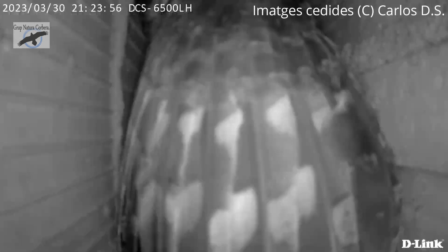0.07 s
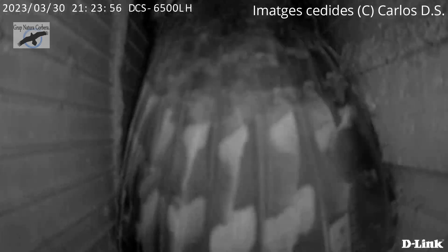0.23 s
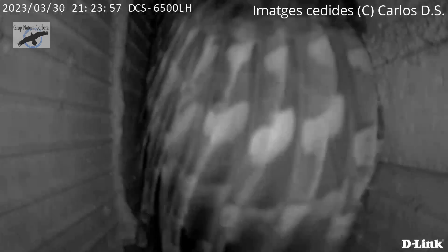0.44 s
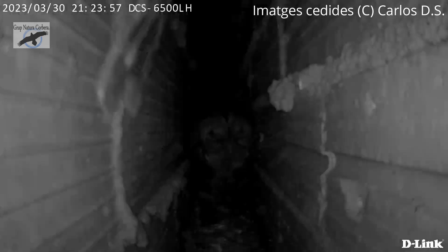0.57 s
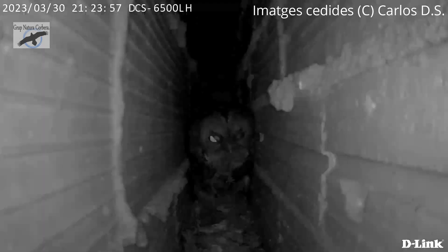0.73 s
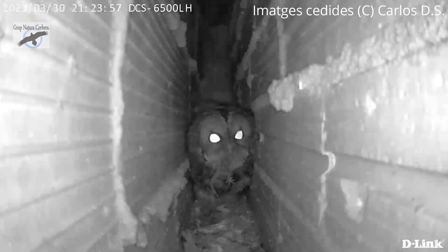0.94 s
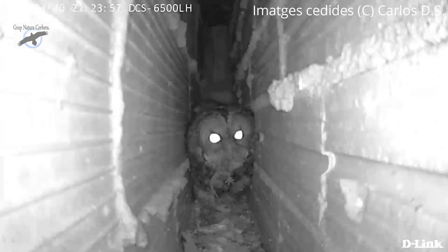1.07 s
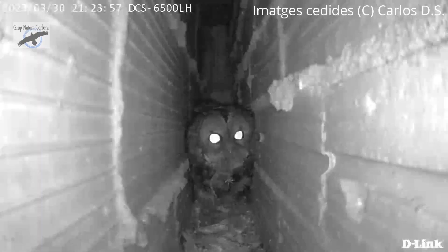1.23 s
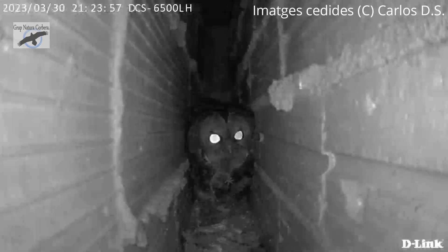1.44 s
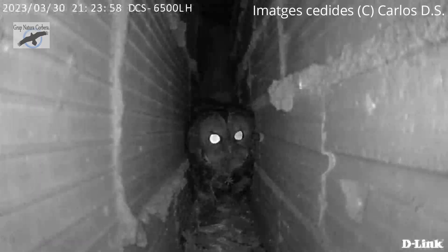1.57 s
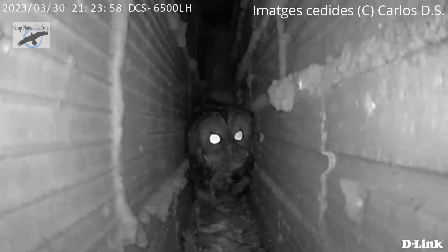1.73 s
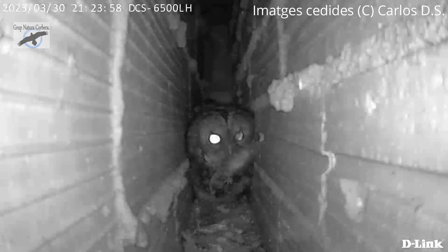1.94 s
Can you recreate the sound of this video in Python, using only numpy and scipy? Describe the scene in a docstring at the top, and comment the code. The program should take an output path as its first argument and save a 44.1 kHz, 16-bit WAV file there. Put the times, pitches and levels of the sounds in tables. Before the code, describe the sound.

A loud owl call dominates from about 0.2 to 0.52 s: a pure whistle near 1.1 kHz, sagging slightly, then swooping up to a harsh, raspy peak and dropping off. Feathers rustle and feet thump low on wood from the start, with claw scratches, strongest near 0.6 s. Sparse soft bumps fade by 1.6 s into faint air; a second call just begins at 1.93 s. Boxy, short reflections, thin metallic microphone.

```python
"""Owl calling in a nest box

An owl gives one loud call inside a wooden nest box: a pure whistle that sags, then swoops up into a harsh peak.
Shaped noise makes the feather rustle, shuffling and claw scratches; foot bumps ring the box's resonances.
Stacked sine waves and hiss make the voice; a second call just begins at the end.
A small camera microphone hears it all through a narrow band and adds a thin metallic sheen."""
import sys
import numpy as np
from scipy import signal
from scipy.fft import rfft, irfft
from scipy.io import wavfile
from scipy.ndimage import uniform_filter1d, map_coordinates

SR = 44100
rng = np.random.default_rng(int(sys.argv[2]) if len(sys.argv) > 2 else 0)


def inscribe(sig):
    """Save sig as 16-bit PCM at rate SR to the path in sys.argv[1].

    A 1-D sig is mono; a 2-D sig holds one channel per row.
    Samples are clipped to [-1, 1] before scaling.
    """
    pcm = np.round(np.clip(np.atleast_2d(sig).T, -1, 1) * 32767)
    wavfile.write(sys.argv[1], SR, pcm.astype(np.int16))


N = 88200
T = np.arange(N) / SR  # time in seconds

# tone colour of the owl's rasp: pitch_hz, relative_db
THROAT_COLOUR = [(300, -44.5), (900, -27.5), (1150, -1.5), (1500, -12), (1900, -26), (2150, -1.5),
                 (2700, -6), (3400, -3.5), (4000, -6), (4600, -5.5), (5500, -21)]


def undb(db):
    """Turn decibels into a gain."""
    return 10 ** (np.asarray(db) / 20)


def envelope(rows):
    """Draw a gain curve through (start_s, level_db) points, practically silent outside them."""
    start_s, level_db = np.array(rows).T
    return undb(np.interp(T, start_s, level_db, left=-200, right=-200))


def colour(x, points):
    """Shape the spectrum of a sound by (pitch_hz, relative_db) points and set its rms to 1."""
    pitch_hz, relative_db = np.array(points).T
    bins_hz = np.maximum(np.arange(N // 2 + 1) * SR / N, 1)
    gain = undb(np.interp(np.log(bins_hz), np.log(pitch_hz), relative_db))
    shaped = irfft(rfft(x) * gain, N)
    return shaped / shaped.std()


def noise():
    """White noise: equally strong at every pitch."""
    return rng.standard_normal(N)


def walk(rate_hz):
    """A smooth random wander with spread 1; a higher rate wanders faster."""
    width = max(int(SR / rate_hz), 1)
    wander = uniform_filter1d(uniform_filter1d(noise(), width), width)
    return wander / wander.std()


def feathers():
    """Feathers brushing wood: five bands of noise an octave apart, each swelling a little on its own."""
    # level of the rustle: start_s, level_db
    rustle_level = [(0, -36.5), (.055, -43), (.18, -46), (.45, -47.5), (.57, -42.5), (.65, -42.5),
                    (.68, -49.5), (.78, -43.5), (.82, -54), (.88, -51.5), (.945, -59), (1.0, -93),
                    (1.14, -80), (1.21, -78), (1.265, -86), (1.35, -103), (2, -99)]
    # tone colour of the rustle: pitch_hz, relative_db
    feather_colour = [(150, -1.5), (300, 14.5), (420, 4.5), (620, 5.5), (1000, 1), (2000, -7), (3200, 1.5),
                      (4300, -3.5), (5000, -21.5)]
    brush = np.zeros(N)
    for hz in 250 * 2.0 ** np.arange(5):
        band = colour(noise(), [(hz / 4, -40), (hz, 0), (hz * 4, -40)])
        brush += band * np.sqrt(hz) * undb(2.5 * walk(45))
    flutter = undb(4.1 * walk(1500) + 2 * walk(200))
    return envelope(rustle_level) * colour(brush * flutter, feather_colour)


def feet():
    """Each soft push of a foot rings the box's resonances, over a low shuffle of noise."""
    # level of the shuffling on the boards: start_s, level_db
    shuffle_level = [(0, -39.5), (.15, -37), (.23, -48), (.48, -42.5), (.57, -31), (.7, -37), (.83, -49),
                     (.92, -45.5), (1.12, -55.5), (1.27, -44), (1.39, -71.5), (1.47, -65), (1.53, -47),
                     (1.62, -57), (1.73, -72.5), (2, -74)]
    # tone colour of the boards: pitch_hz, relative_db
    board_colour = [(15, -27.5), (31, -1), (52, -24), (85, -2), (110, 2.5), (165, -5), (260, -11.5),
                    (350, -29), (700, -57), (1500, -71.5)]
    # resonances of the box: pitch_hz, level_db, time to fade by 60 dB (fade_s)
    box_modes = [(32.54, -11, 0.39), (93.27, -4, .17), (119.1, -5, 0.19), (175, -4.5, .08),
                 (247, -3.5, .08), (315, -4.5, 0.091)]
    # foot bumps: start_s, level_db, contact_s
    bumps = [(.003, -28.5, 0.0028), (0.149, -31, 0.0005), (0.263, -30.5, 0.0037), (0.426, -22.5, 0.0041),
             (0.573, -27.5, 0.00099), (0.673, -27.5, 0.0046), (0.755, -27, 0.001), (0.87, -34.5, 0.0027),
             (.955, -27.5, .02), (1.066, -42, 0.0043), (1.169, -26, 0.015), (1.249, -30.5, 0.0057),
             (1.486, -35.5, 0.0047), (1.581, -30, 0.0042)]
    ring = np.zeros(N)
    for pitch_hz, level_db, fade_s in box_modes:
        ring += undb(level_db - 60 * T / fade_s) * np.sin(2 * np.pi * pitch_hz * T)
    out = envelope(shuffle_level) * colour(noise() * undb(1.7 * walk(50)), board_colour)
    for start_s, level_db, contact_s in bumps:
        push = np.sin(np.pi * np.clip((T - start_s) / contact_s, 0, 1))
        out += undb(level_db) * signal.fftconvolve(push / push.sum(), ring)[:N]
    return out


def call():
    """A whistle gains harmonics; rasp shakes the pitch, splits the period and adds pulsed hiss."""
    # pitch of the call: start_s, pitch_hz
    pitch = [(.14, 1090), (.22, 1112), (.275, 1052), (.302, 1001), (.335, 998), (.365, 1046), (.398, 1145),
             (.418, 1228), (.44, 1322), (.459, 1377), (.478, 1332), (.493, 1280), (.507, 1105),
             (.525, 1023)]
    # levels of the fundamental and its next three harmonics: start_s, level_db
    whistle = [(.12, -63), (.15, -42.5), (.199, -46), (.208, -14), (.28, -13.5), (.30, -18), (.315, -19),
               (.36, -11.5), (.385, -10.8), (.394, -9.5), (.417, -16.5), (.51, -16), (.522, -26.5),
               (.535, -61)]
    second = [(.195, -70.5), (0.209, -45), (.26, -33.5), (.37, -27), (.392, -40.5), (0.413, -24),
              (.432, -16.5), (0.444, -7), (.491, -7), (0.506, -40), (.53, -61.5)]
    third = [(.198, -71), (.22, -28), (.27, -32.5), (.325, -39), (.393, -19), (.41, -33.5), (.425, -17.5),
             (.488, -11.5), (.503, -36), (.525, -67)]
    fourth = [(.255, -63.5), (.28, -35), (.30, -35.5), (.355, -41), (.375, -56), (.39, -72.5)]
    # level of the rasp in the voice: start_s, level_db
    rasp_level = [(.195, -72), (.208, -38), (.23, -53.5), (.315, -48), (.345, -38), (.392, -25.5),
                  (.412, -35), (.46, -30), (.493, -21.5), (.51, -32.5), (.525, -63)]
    jitter, rasp_jitter = 0.0014, 0.009  # fractions of the pitch
    shimmer_db = 0.3  # level unsteadiness, times the harmonic number
    half_db, half_waver_rad = -4, 0.9  # half harmonics against the rasp; their unsteadiness

    rasp = envelope(rasp_level)
    hz = uniform_filter1d(np.interp(T, *np.array(pitch).T), size=400)
    hz = hz * (1 + jitter * walk(250) + rasp_jitter * rasp / rasp.max() * walk(1400))
    phase = 2 * np.pi * np.cumsum(hz) / SR

    voice = np.zeros(N)
    for k, level in enumerate([whistle, second, third, fourth], 1):
        voice += envelope(level) * undb(shimmer_db * k * walk(160)) * np.sin(k * phase)

    # tones halfway between the harmonics roughen the voice
    halves = sum(np.sin((k + 0.5) * phase + half_waver_rad * walk(300)) for k in range(1, 4))
    # the hiss pulses once per cycle of the whistle
    hiss = noise() * (1 + 0.89 * np.cos(phase)) * undb(2.5 * walk(350))
    harshness = colour(hiss, THROAT_COLOUR) + undb(half_db) * colour(halves, THROAT_COLOUR)
    return np.sqrt(2) * voice + rasp * harshness  # root two makes sine levels rms


def claws():
    """Short gritty claw scratches: flickering noise coloured by the wood, rising and dying away quickly."""
    # claw scratches: start_s, level_db, length_s (time constant of the fade), centre_hz
    scratches = [(0.141, -36.5, 0.015, 700), (0.564, -31, 0.0099, 600), (0.642, -46.5, 0.034, 1780),
                 (0.699, -41.5, 0.021, 2233), (0.769, -39, 0.0077, 1798), (1.175, -63, 0.087, 1552),
                 (1.223, -42, 0.01, 863), (1.264, -63, 0.0058, 3600), (1.488, -64, 0.0099, 450),
                 (1.501, -58.5, 0.018, 3530), (1.557, -59, 0.02, 3630), (1.585, -64, 0.017, 500)]
    # higher resonances of the boards that a claw excites: pitch_hz, relative_db
    scraped_wood = [(300, 0.5), (600, 4), (800, 2.5), (1150, 5), (1600, -4), (2050, 5), (2500, -7.5),
                    (3000, 0.5), (3550, 4.5), (4200, -4)]
    attack_s, spread = 0.0075, 2 ** 3.9  # the tone slopes over 3.9 octaves on each side
    out = np.zeros(N)
    for start_s, level_db, length_s, centre_hz in scratches:
        age = np.maximum(T - start_s, 0)
        wood = colour(noise() * undb(1.519 * walk(1200)), scraped_wood)
        grit = colour(wood, [(centre_hz / spread, -18), (centre_hz, 0), (centre_hz * spread, -18)])
        out += undb(level_db) * np.minimum(age / attack_s, 1) * np.exp(-age / length_s) * grit
    return out


def next_call():
    """The soft lead-in of another call, a wavering sine with hiss, then its first rasp with two harmonics."""
    lead_s, lead_attack_s, lead_hz = 1.925, 0.028, 1112
    lead_db, lead_waver_db = -50, 1.5
    open_s, open_attack_s, open_db = 1.982, 0.0098, -44.5
    phase = 2 * np.pi * np.cumsum(lead_hz * (1 + 0.0168 * walk(290))) / SR
    lead = np.clip((T - lead_s) / lead_attack_s, 0, 1) * undb(lead_db + lead_waver_db * walk(110))
    opening = np.clip((T - open_s) / open_attack_s, 0, 1) * undb(open_db)
    whistle = np.sqrt(2) * np.sin(phase) + undb(-33.5) * colour(noise(), THROAT_COLOUR)
    harmonics = 0.5 * np.sin(2 * phase) + 0.5 * np.sin(3 * phase)
    rasp = 0.84 * colour(noise(), THROAT_COLOUR) + harmonics
    return lead * whistle + opening * rasp


def cavity(x):
    """Add dense, quickly fading reflections between the walls, made from a fading burst of noise."""
    # tone colour of the reflections: pitch_hz, relative_db
    wall_colour = [(200, -5.5), (900, -4), (1200, -0.5), (1700, -5), (2600, -18), (4200, -13)]
    fade_s, reflections_db = 0.18, -23  # time to fade by 60 dB; level of the reflections
    fade = np.exp(-np.log(1000) * T / fade_s)
    tail = colour(noise(), wall_colour) * fade * (T > 0.003)  # a 3 ms gap comes first
    return x + undb(reflections_db) * signal.fftconvolve(x, tail / np.linalg.norm(tail))[:N]


def air():
    """Faint, steady air: noise that is strongest in the bass."""
    # tone colour of the air: pitch_hz, relative_db
    air_colour = [(30, 5), (110, 23), (260, 9.5), (450, -0.5), (1000, 0), (2000, -11.5), (4200, -12.5)]
    return undb(-69) * colour(noise(), air_colour)


def scene():
    """Mix the voice, feathers and claws inside the box with the feet and faint air."""
    inside = cavity(feathers() + call() + claws() + next_call())
    return (inside + feet() + air())[None]


def record(dry):
    """Clip the peaks, narrow the band, then join slow samples by straight lines.

    The straight lines mirror the call into the treble, which gives the metallic sheen."""
    ceiling = 0.84
    band_hz, camera_rate_hz, top_hz = 4212, 16000, 15700  # band edge, sample rate, final treble limit
    leak_db = -31.5  # lets a little through just above the band
    x = np.clip(dry[0], -ceiling, ceiling)
    narrow = signal.sosfilt(signal.ellip(8, 0.3, 55, band_hz, fs=SR, output="sos"), x)
    leak = signal.sosfilt(signal.butter(8, 4800, fs=SR, output="sos"), x)
    narrow = narrow + undb(leak_db) * leak
    ticks_s = np.arange(N * camera_rate_hz // SR + 1) / camera_rate_hz
    samples = map_coordinates(narrow, [ticks_s * SR], mode="nearest")
    joined = np.interp(T, ticks_s, samples)
    return signal.sosfilt(signal.ellip(8, 0.2, 70, top_hz, fs=SR, output="sos"), joined)[None]


dry = scene()
out = record(dry)
inscribe(out)
```